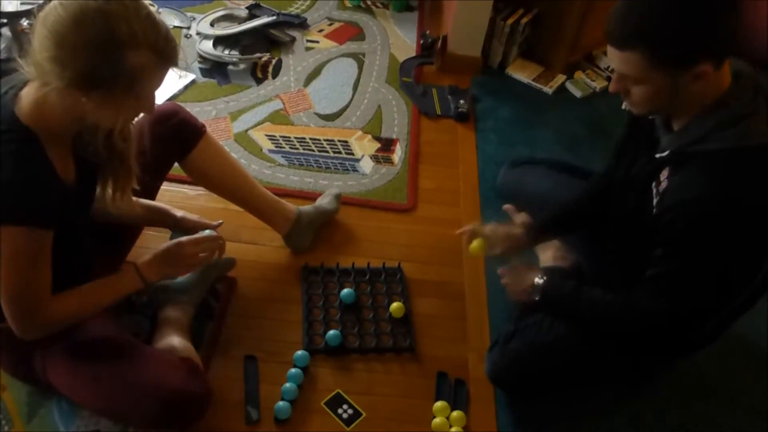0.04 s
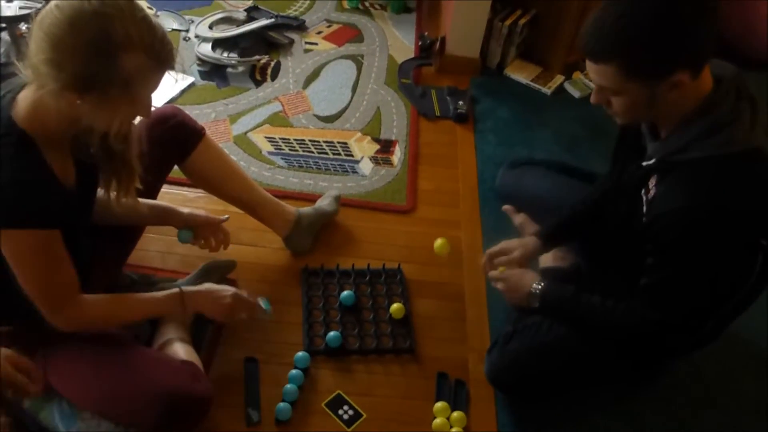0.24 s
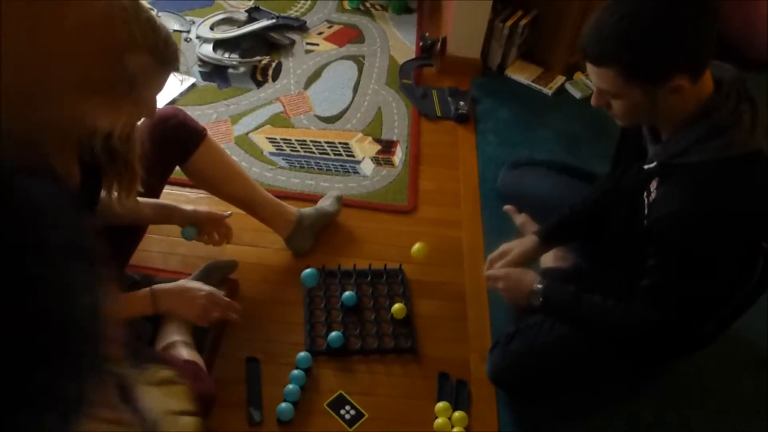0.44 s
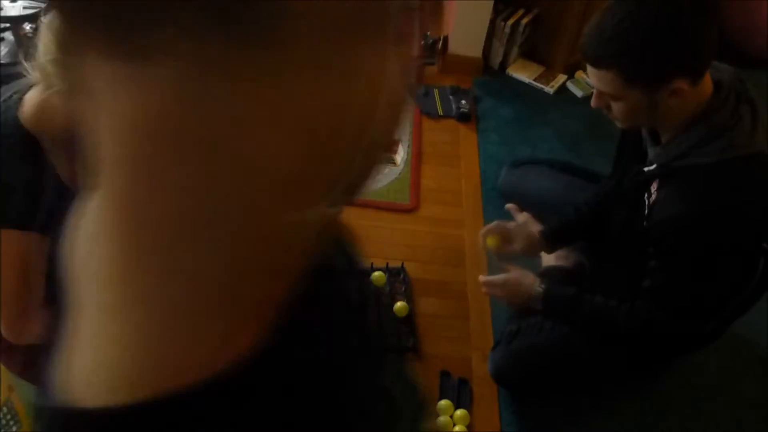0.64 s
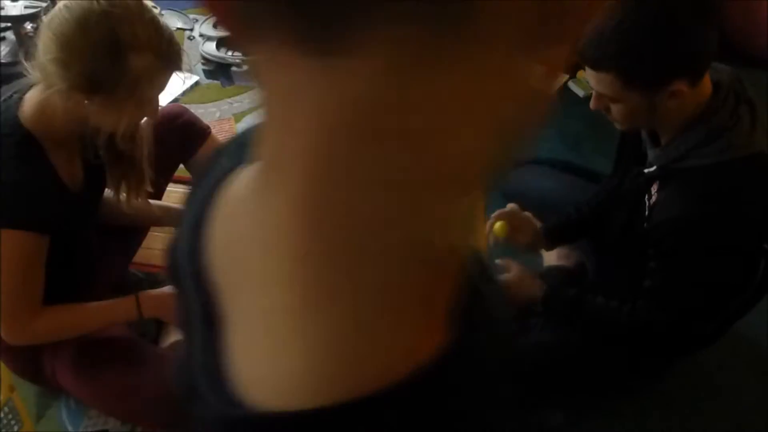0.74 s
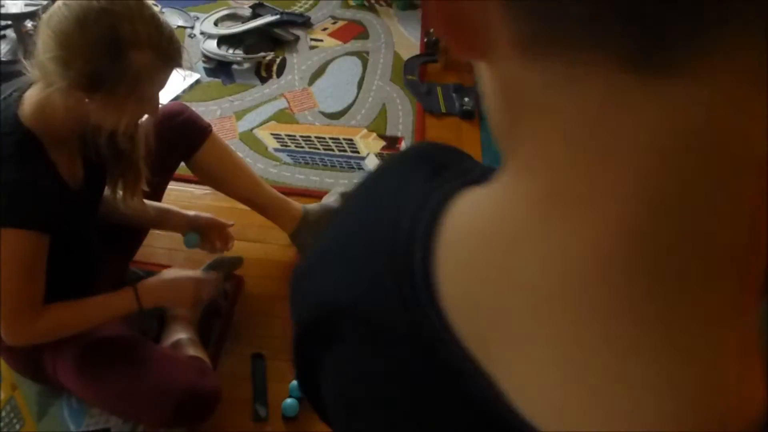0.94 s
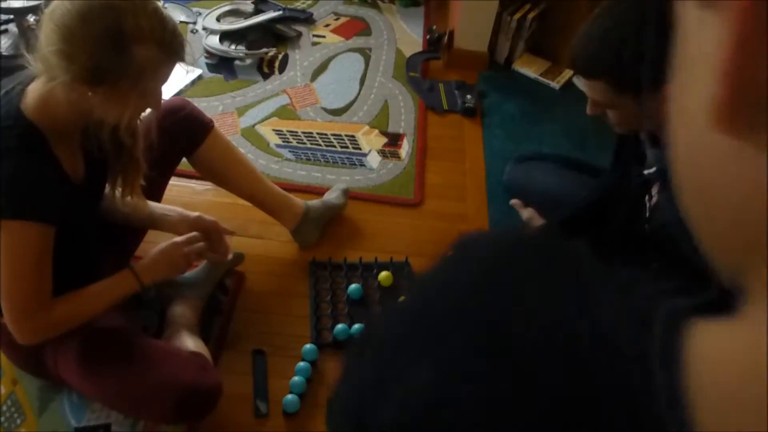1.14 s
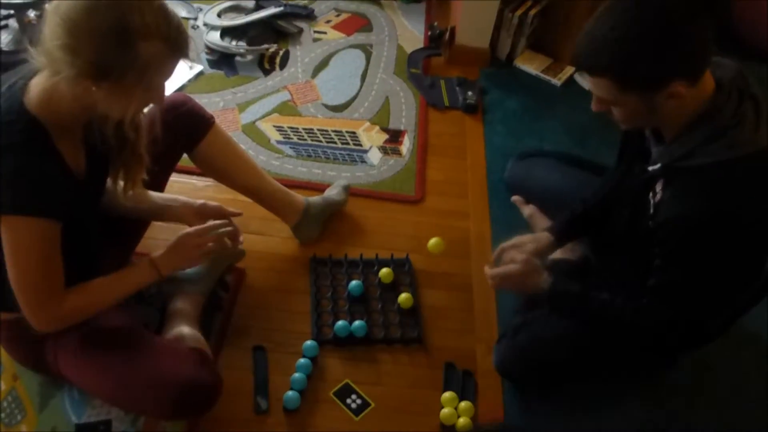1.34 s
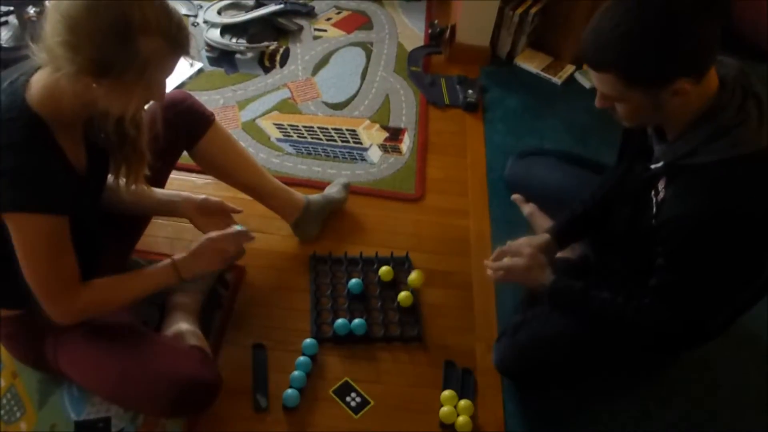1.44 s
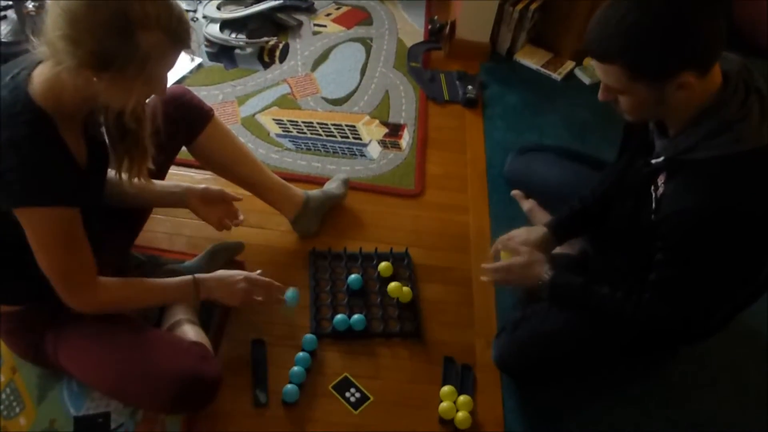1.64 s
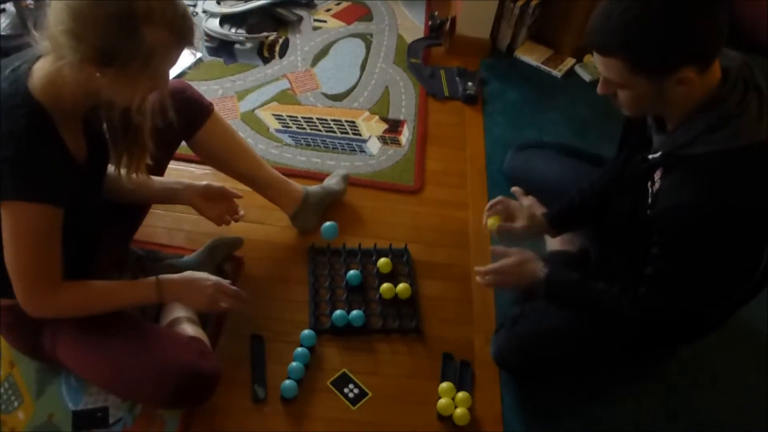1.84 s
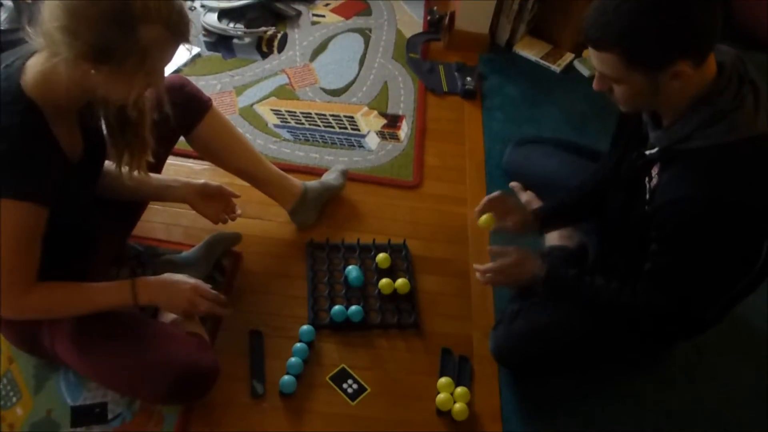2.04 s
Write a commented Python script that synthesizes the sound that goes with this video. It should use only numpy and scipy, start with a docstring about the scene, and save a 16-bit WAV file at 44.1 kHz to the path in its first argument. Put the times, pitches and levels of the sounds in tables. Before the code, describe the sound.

In a quiet living room, plastic balls hit the floorboards four times with sharp clicks and clatter into a plastic tray between bounces. Soft thumps and faint clothing rustle lie underneath, and a microphone high above catches a brief echo.

```python
"""Bouncing balls into a tray

In a living room, two players bounce hollow plastic balls off a wooden floor into a plastic tray.
Each bounce knocks the boards and makes the ball's shell ring brightly; then the balls clack and rattle
into the tray's cups. Limbs bump the floor and clothes rustle. The microphone is high up, so an echo
from the ceiling follows every hit."""
import sys
import numpy as np
from scipy import signal
from scipy.fft import rfft, irfft
from scipy.io import wavfile

SR = 44100
rng = np.random.default_rng(int(sys.argv[2]) if len(sys.argv) > 2 else 0)


def bounce(signal):
    """Save signal as a 16-bit WAV file at the path given by the first command-line argument."""
    frames = np.transpose(np.atleast_2d(signal))
    limited = np.clip(frames, -1, 1)
    pcm = np.round(limited * 32767).astype(np.int16)
    wavfile.write(sys.argv[1], SR, pcm)


N = 92610
TIME = np.arange(N) / SR
HIT_SIZE = 24576  # samples given to one hit to die away
HIT_TIME = TIME[:HIT_SIZE]


def from_db(db):
    """Turn decibels into a number to multiply by."""
    return 10 ** (np.asarray(db) / 20)


def unit(x):
    """Scale a sound to an energy of one."""
    return x / np.sqrt(np.sum(x ** 2) + 1e-20)


def at_hz(points, hz):
    """Read between the rows of a table, with octaves evenly spaced."""
    f, value = np.transpose(points)
    return np.interp(np.log(np.maximum(hz, 1)), np.log(f), value)


def gains(colour, size):
    """Turn a colour (how loud lows, middles and highs are) into a gain for each frequency."""
    return from_db(at_hz(colour, np.fft.rfftfreq(size, 1 / SR)))


def fade(fade_s):
    """Die away by 60 dB in fade_s seconds; every fade time below means this."""
    return from_db(-60 * HIT_TIME / fade_s)


def add(track, s, sound):
    """Mix a stereo sound in, starting at s seconds."""
    i = int(s * SR)
    track[:, i:i + sound.shape[1]] += sound[:, :N - i]


def click(colour):
    """The shortest click that starts at once and has this colour."""
    cepstrum = irfft(np.log(gains(colour, HIT_SIZE)))
    # folding the second half onto the first moves the energy to the start
    cepstrum[1:HIT_SIZE // 2] *= 2
    cepstrum[HIT_SIZE // 2 + 1:] = 0
    return unit(irfft(np.exp(rfft(cepstrum))))


def ring(tones, scatter_db=1.0):
    """A struck thing rings with its own tones, each a little louder or softer at every blow."""
    out = 0
    for k, (hz, db, fade_s) in enumerate(tones):
        tone = unit(np.sin(2 * np.pi * hz * HIT_TIME) * fade(fade_s))
        out += (-1) ** k * from_db(db + scatter_db * rng.normal()) * tone
    return out


def clatter(colour, fade_s, snap_db):
    """A snap, then so many short tones together that none stands out."""
    burst = unit(rng.standard_normal(HIT_SIZE) * fade(fade_s))
    burst[0] += from_db(snap_db)
    for _ in range(3):  # even out chance peaks while keeping the burst short
        spectrum = rfft(burst)
        burst = irfft(spectrum / (np.abs(spectrum) + 1e-12)) * (HIT_TIME < fade_s)
    return unit(signal.fftconvolve(burst, click(colour))[:HIT_SIZE])


# how much of the noise differs between left and right: f/Hz, level/dB
STEREO_WIDTH = [(60, -11), (150, -18), (300, -27), (900, -7.5), (4000, -11)]

def stereo_noise(size):
    """White noise, nearly alike on the left and right."""
    middle, side = rng.standard_normal((2, size))
    side = irfft(rfft(side) * gains(STEREO_WIDTH, size), size)
    return middle + side * [[1], [-1]]


def hiss(colour):
    """Steady noise with this colour and a typical size (rms) of one."""
    noise = irfft(rfft(stereo_noise(N)) * gains(colour, N), N)
    return noise / noise.std()


# colour of the quiet room: f/Hz, level/dB
AIR_COLOUR = [(18, -35), (30, -48), (161, 2.5), (252, 0), (328, 4.5), (404, -2.5), (1280, -7), (2680, -14),
              (4910, -16), (6380, -17), (16000, -22)]

def room_air():
    """The room's air is a faint, steady hush."""
    return from_db(-53) * hiss(AIR_COLOUR)


# how long the room keeps sounding: f/Hz, fade/s
TAIL_FADES = [(150, 0.61), (400, 0.34), (1000, 0.44), (2800, 0.42), (7500, 0.27), (14000, 0.19)]
# colour of that lingering sound: f/Hz, level/dB
TAIL_COLOUR = [(60, -13.5), (160, 4.5), (1000, 2.5), (3000, -4.5), (8000, -2), (15000, -4)]

def room_tail(build_s=0.00083):
    """Countless echoes blur into a tail that builds quickly; each band fades at its own pace."""
    spectrum = rfft(stereo_noise(HIT_SIZE))
    hz = np.fft.rfftfreq(HIT_SIZE, 1 / SR)
    edges = np.geomspace(40, 20480, 19)
    build = 1 - np.exp(-(HIT_TIME / build_s) ** 2)
    tail = 0
    for low, high in zip(edges, edges[1:]):
        centre = np.sqrt(low * high)
        band = irfft(spectrum * ((hz >= low) & (hz < high)))
        band = unit(band * fade(at_hz(TAIL_FADES, centre)) * build)
        energy_share = (high - low) / (SR / 2)
        tail += band * np.sqrt(2 * energy_share) * from_db(at_hz(TAIL_COLOUR, centre))
    return tail


# quick early echoes, fluttering between floor and ceiling: delay/s, level/dB
EARLY_ECHOES = [(.0075, -13.5), (0.0147, -11), (0.0204, -12)]
FLOOR_TAIL_DB, TRAY_TAIL_DB = 0.5, 6
CEILING_DB, TRAY_CEILING_S = -4, 0.00585

def in_room(hit, s, tail_db, ceiling_s):
    """A hit arrives directly, then as echoes; every spot on the floor has a tail of its own."""
    response = from_db(tail_db) * room_tail()
    direct_db = -3 if 0.5 < s < 1.2 else 0  # someone steps between the tray and the microphone
    response[:, 0] += from_db(direct_db)
    for delay_s, db in [(ceiling_s, CEILING_DB), *EARLY_ECHOES]:
        response[:, int(delay_s * SR)] += from_db(db)
    return signal.fftconvolve(hit[None], response, axes=1)[:, :len(hit)]


# soft bumps on the floor: t/s, level/dB, dull above f/Hz
LIMB_BUMPS = [(0.002, -22, 880), (0.179, -12.5, 806), (0.185, -9.5, 690), (0.613, -11, 400),
              (0.971, -14.5, 3080), (1.284, -7.5, 910), (1.932, -7.5, 1000), (1.949, -14, 1260)]
# colour of a bump: f/Hz, level/dB
BUMP_COLOUR = [(50, -39), (150, -16), (330, 5), (750, 1.5), (1500, 0), (4000, -7), (12000, -20)]

def limb_bumps():
    """Hands and feet meet the floor near the tray; each touch loses its treble above its own frequency."""
    out = np.zeros((2, N))
    for s, db, dull_hz in LIMB_BUMPS:
        thud = clatter(BUMP_COLOUR, fade_s=0.05, snap_db=-14.5)
        thud = signal.sosfilt(signal.butter(1, dull_hz, fs=SR, output="sos"), thud)
        add(out, s, in_room(from_db(db) * thud, s, FLOOR_TAIL_DB, TRAY_CEILING_S))
    return out


# short booms: middle t/s, half length/s, f/Hz, level/dB
HOLLOW_BOOMS = [(0.197, 0.013, 214, -27), (0.246, 0.019, 305, -29), (0.258, 0.0082, 650, -25.5),
                (1.167, 0.017, 300, -26.5), (1.173, 0.0043, 663, -21)]

def hollow_booms():
    """A low thump, and short hollow echoes just after the yellow ball's bounces."""
    out = np.zeros(N)
    for s, half_s, hz, db in HOLLOW_BOOMS:
        swell = np.exp(-((TIME - s) / half_s) ** 2)
        out += from_db(db) * np.sin(2 * np.pi * hz * (TIME - s)) * swell
    return out


def contact(knock, contact_s, loss_db=3.5):
    """The ball's push rises and falls, weakening on the rebound; this softens the knock's treble."""
    progress = np.clip(HIT_TIME / contact_s, 0, 1)
    push = np.sin(np.pi * progress) * from_db(-loss_db * progress)
    return unit(signal.fftconvolve(knock, push)[:len(knock)])


def ball_shell(upper_tones, low_hz, low_db, upper_db):
    """A hollow ball is not quite round, so each tone of its shell splits into a close pair."""
    low_split_hz, low_fade_s, upper_split = 123, 0.0098, 0.012
    lowest = [(low_hz + side * low_split_hz, 0, low_fade_s) for side in (-1, 1)]
    upper = [(hz * (1 + side * upper_split * rng.uniform(0.7, 2.25)), db, fade_s)
             for hz, db, fade_s in upper_tones for side in (-1, 1)]
    return np.sqrt(.5) * (from_db(low_db) * ring(lowest) + from_db(upper_db) * ring(upper))


# each ball's bounces: t/s, knock level/dB, contact time/s, floor and room ring level/dB,
# lowest shell tone f/Hz, its level/dB, upper shell tones level/dB, ceiling echo delay/s
YELLOW_LANDINGS = [(0.2327, 9.5, 0.000428, -9.5, 7850, -3, 2.5, .00571),
                   (1.1467, 4.5, 0.000574, -6.5, 8250, 3, 3.5, .00551)]
BLUE_LANDINGS = [(0.3860, 11.5, 0.000335, -6, 8635, 14.1, -2, .00596),
                 (1.7033, 10.6, 0.000425, -6, 8560, 3.9, 0.72, 0.0052)]
# colour of each ball's knock before the contact softens it: f/Hz, level/dB
YELLOW_KNOCK_COLOUR = [(40, -39), (110, -16), (280, 0), (700, -1.5), (1400, 1), (2150, 9.5), (3300, 14),
                       (4700, 16.5), (7500, 20), (10000, 36.5), (16000, 19.5)]
BLUE_KNOCK_COLOUR = [(40, -79), (110, -19), (330, -4), (620, -9), (1150, 2), (2200, 7), (3200, 10.5),
                     (4700, 12.5), (7400, 13), (10000, 29), (16000, 29.5)]
# low tones of floor and room that ring after a bounce: f/Hz, level/dB, fade/s
YELLOW_LOW_TONES = [(310, -5.5, 0.076), (358, -3.5, 0.035), (439, -6, 0.33), (623, -6, 0.037),
                    (983, -3.5, 0.025), (1323, 1, 0.086), (3570, -9.5, .004)]
BLUE_LOW_TONES = [(366, -5, 0.35), (430, -5, 0.054), (889, 1.5, 0.14), (1322, -18, 0.098), (1450, 0, 0.035),
                  (2120, -11, 0.15)]
# upper tones of each ball's shell: f/Hz, level/dB, fade/s
YELLOW_SHELL_TONES = [(10280, 0, 0.0043), (11440, 4.5, 0.0048), (13300, 4.5, 0.005), (14800, -8.5, .004)]
BLUE_SHELL_TONES = [(9660, 2, 0.0044), (10850, 1, 0.0091), (12140, 1.5, 0.011), (14500, 2.5, 0.0072),
                    (14800, -6.5, 0.0042)]

def floor_bounces(landings, knock_colour, low_tones, shell_tones):
    """A ball lands with a sharp knock that sets the floor, the room and its own shell ringing."""
    out = np.zeros((2, N))
    for s, knock_db, contact_s, ring_db, low_hz, low_db, upper_db, ceiling_s in landings:
        knock = clatter(knock_colour, fade_s=0.009, snap_db=1.5)
        knock = from_db(knock_db) * contact(knock, contact_s)
        low_ring = from_db(ring_db) * ring(low_tones)
        shell = ball_shell(shell_tones, low_hz, low_db, upper_db)
        add(out, s, in_room(knock + low_ring + shell, s, FLOOR_TAIL_DB, ceiling_s))
    return out


# rustles: middle t/s, half length/s, level/dB
SLEEVE_RUSTLES = [(0.564, 0.11, -46.5), (0.76, 0.063, -37), (1.136, 0.013, -53.5), (1.93, 0.084, -37.5)]
# colour of sliding cloth: f/Hz, level/dB
CLOTH_COLOUR = [(150, -10.5), (400, 11.5), (1000, -10), (2500, -4), (5000, 1), (7000, -7), (9000, -3.5),
                (11000, -9), (15000, -23)]

def clothes():
    """Sleeves slide, making short swells of hiss."""
    swells = sum(from_db(db) * np.exp(-((TIME - s) / half_s) ** 2 / 2)
                 for s, half_s, db in SLEEVE_RUSTLES)
    return hiss(CLOTH_COLOUR) * swells


# faint ticks of balls in a hand: t/s, level/dB
TICKS = [(0.553, -37), (0.969, -30), (1.113, -36), (1.355, -49)]

def hand_ticks():
    """Shells touch lightly while a player gathers the balls."""
    out = np.zeros((2, N))
    for s, db in TICKS:
        tick = ball_shell(BLUE_SHELL_TONES, low_hz=8460, low_db=db, upper_db=db)
        add(out, s, in_room(tick, s, TRAY_TAIL_DB, TRAY_CEILING_S))
    return out


# hits in the tray, the one at 0.789 s a louder repeat of the one just before: t/s, clack level/dB, grid
# level/dB, # lowest shell tone f/Hz, its level/dB, upper shell tones level/dB
TRAY_CLACKS = [(0.6302, 1, 0.5, 8170, -3.5, -5.5), (0.7217, -5.5, -21, 8180, -1, -10),
               (0.7837, -5, -18, 8140, -13, -7), (0.7887, -3, -19, 8650, 5.5, -15),
               (0.7999, 2, -4.5, 8970, -22, -8.5), (1.5374, 2.5, 4.5, 8190, -3, -6.5),
               (1.6212, -13.5, -12.5, 8280, -16.5, -19), (1.6777, -16.5, -15.5, 8260, -22, -27),
               (1.7917, -22, -30, 8200, -29, -24), (1.8030, -8, -16.5, 8210, -3.5, -10.5)]
# colour of a clack: f/Hz, level/dB
CLACK_COLOUR = [(60, -41), (160, -11), (350, -6), (750, -2), (1400, 1.5), (2200, 4), (3400, 3.5), (4600, 4),
                (6500, 0.5), (9100, -1), (10600, 0), (15000, -27)]
# tones of the tray's grid: f/Hz, level/dB, fade/s
GRID_TONES = [(512.4, -17, 0.11), (1344, -14.5, 0.037), (2080, -16.5, 0.036), (3160, -10.5, 0.0059),
              (3570, -7, 0.005)]

def tray_hits():
    """Balls land on the plastic grid, which rings, then clack against each other."""
    out = np.zeros((2, N))
    for s, clack_db, grid_db, low_hz, low_db, upper_db in TRAY_CLACKS:
        clack = from_db(clack_db) * clatter(CLACK_COLOUR, fade_s=0.0169, snap_db=-8.5)
        grid = from_db(grid_db) * ring(GRID_TONES)
        shell = ball_shell(BLUE_SHELL_TONES, low_hz, low_db, upper_db)
        add(out, s, in_room(clack + grid + shell, s, TRAY_TAIL_DB, TRAY_CEILING_S))
    return out


# how much louder the hits are on the left than on the right: f/Hz, level/dB
LEFT_LEAN = [(200, 0.5), (700, 2.4), (2200, 0.56)]

def scene():
    """All the hits, leaning a little to the left, over the clothes and the room's quiet air."""
    yellow = floor_bounces(YELLOW_LANDINGS, YELLOW_KNOCK_COLOUR, YELLOW_LOW_TONES, YELLOW_SHELL_TONES)
    blue = floor_bounces(BLUE_LANDINGS, BLUE_KNOCK_COLOUR, BLUE_LOW_TONES, BLUE_SHELL_TONES)
    hits = yellow + blue + limb_bumps() + tray_hits() + hand_ticks() + hollow_booms()
    lean = gains(LEFT_LEAN, N) ** [[.5], [-.5]]  # left goes up by half the dB, right down by half
    return irfft(rfft(hits) * lean, N) + clothes() + room_air()


def record(dry):
    """The microphone has a narrow dip in the treble, overloads on loud peaks and cuts the very top."""
    dip_hz, top_hz = 9170, 15700
    dipped = dry - signal.lfilter(*signal.iirpeak(dip_hz, Q=15, fs=SR), dry)
    rounded = dipped / (1 + dipped ** 4) ** .25
    return signal.sosfilt(signal.ellip(10, .3, 80, top_hz, fs=SR, output="sos"), rounded)


dry = scene()
out = record(dry)
bounce(out)
```